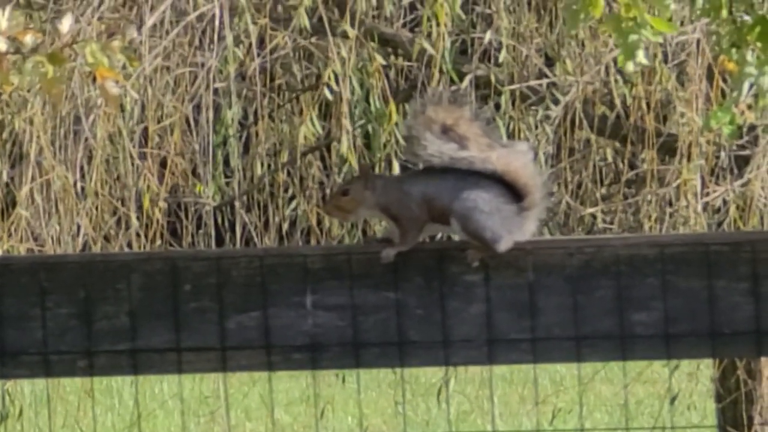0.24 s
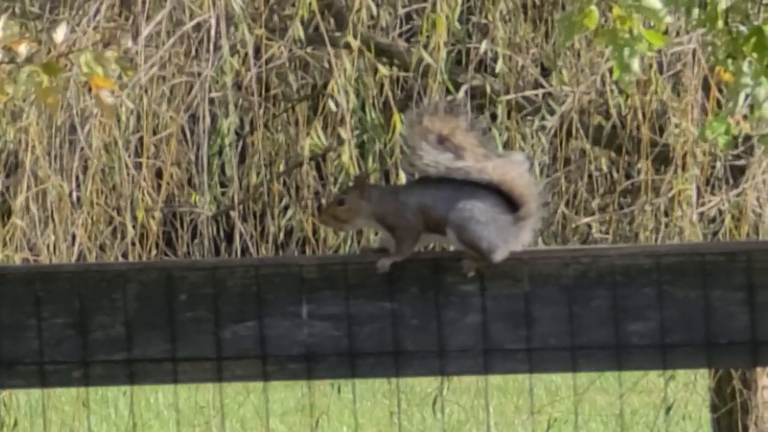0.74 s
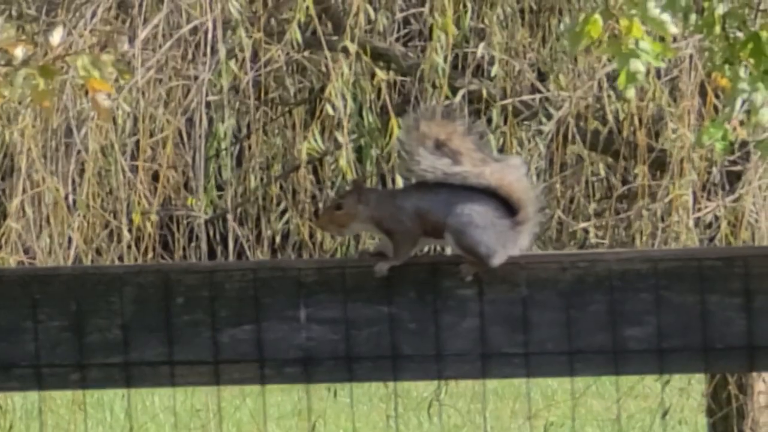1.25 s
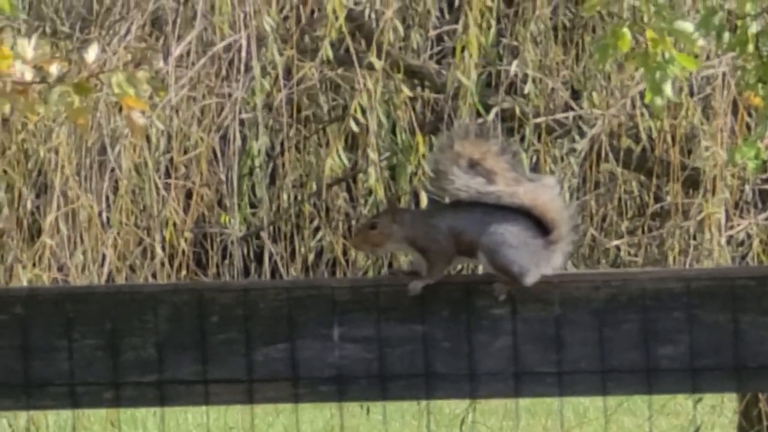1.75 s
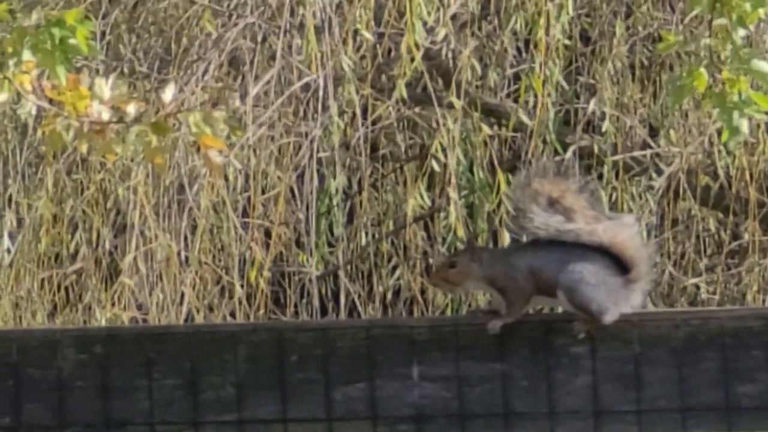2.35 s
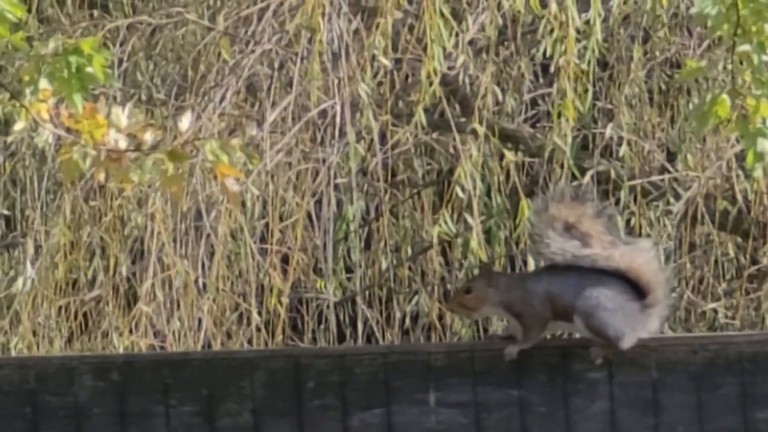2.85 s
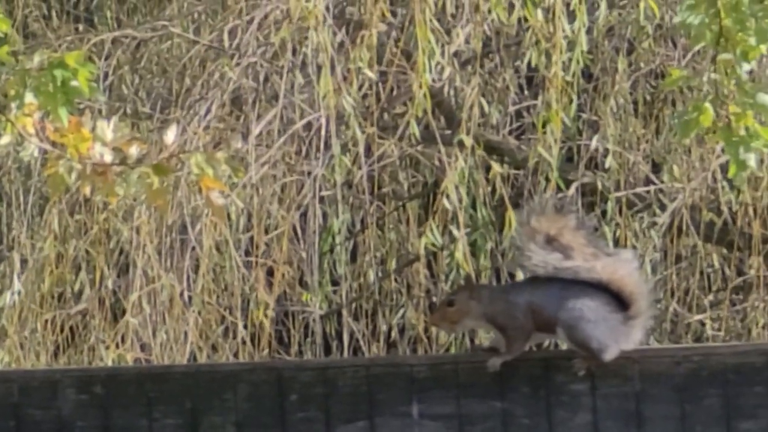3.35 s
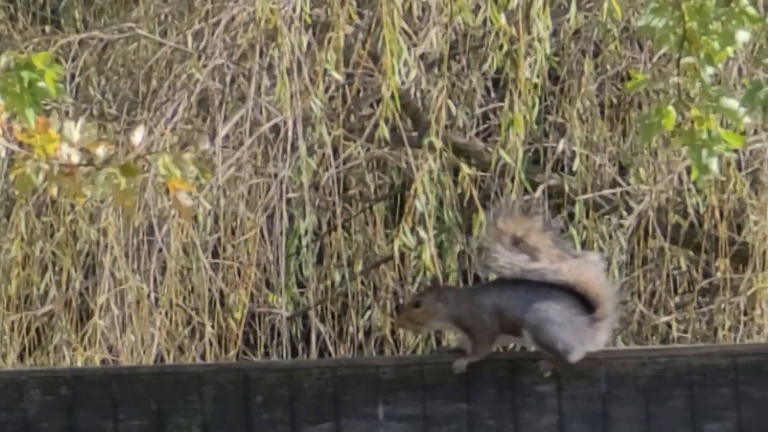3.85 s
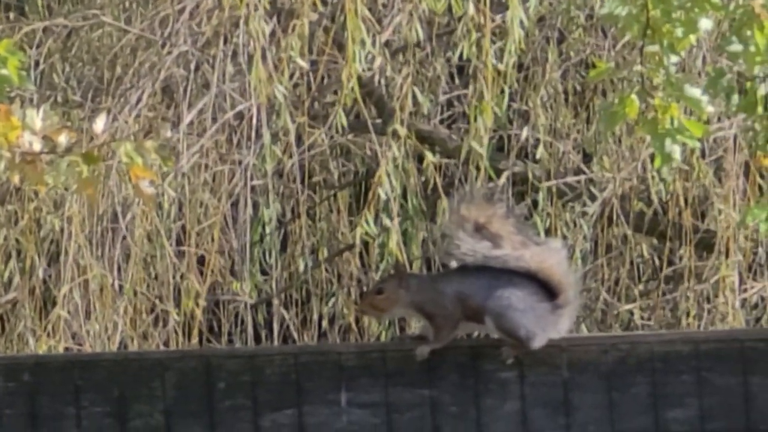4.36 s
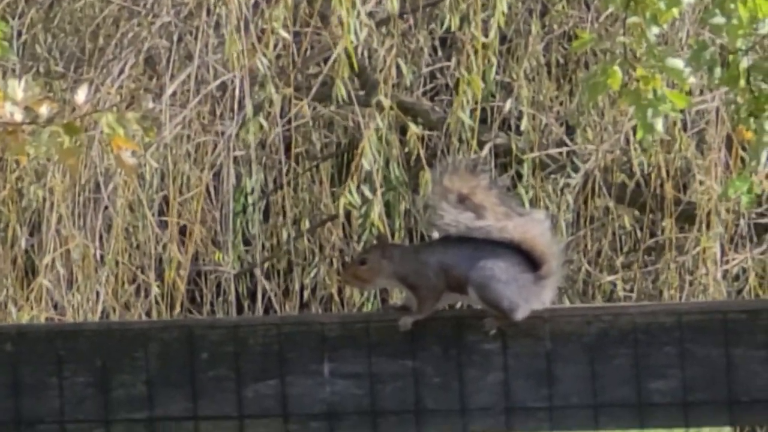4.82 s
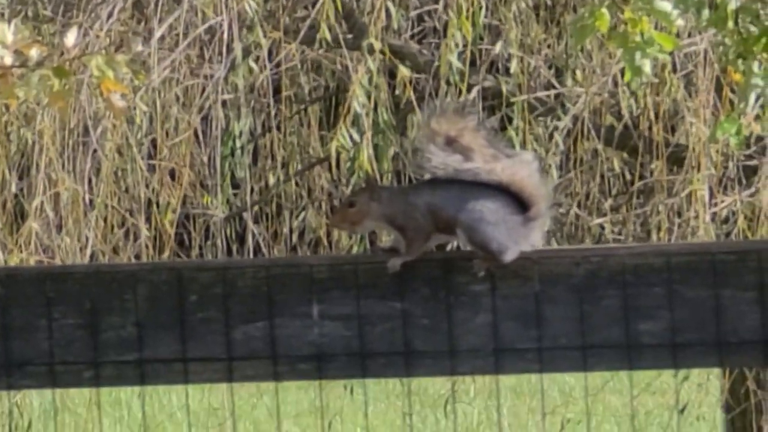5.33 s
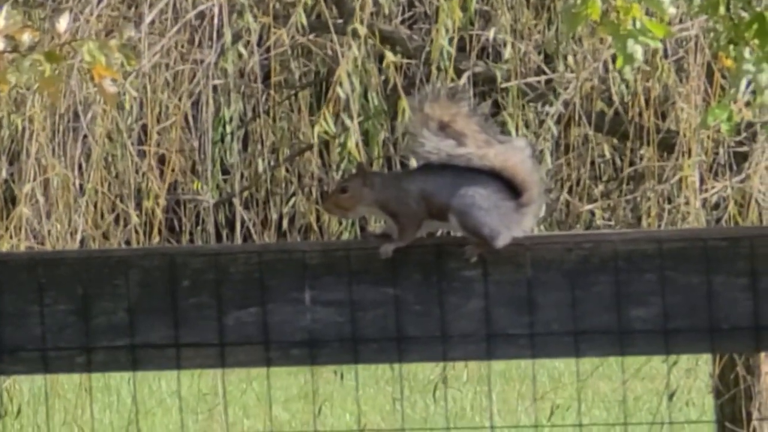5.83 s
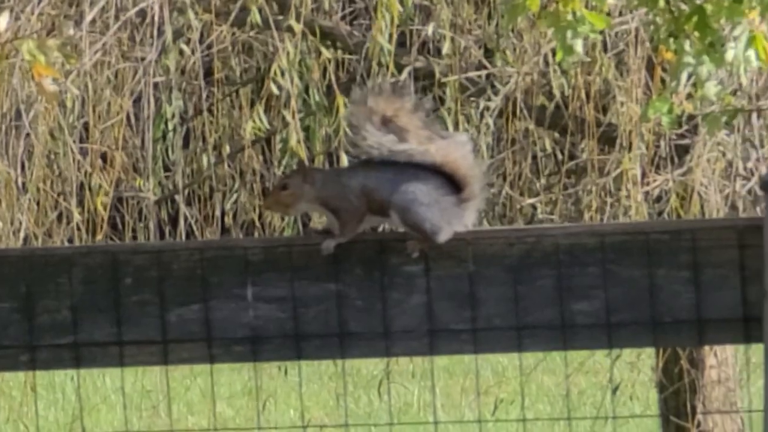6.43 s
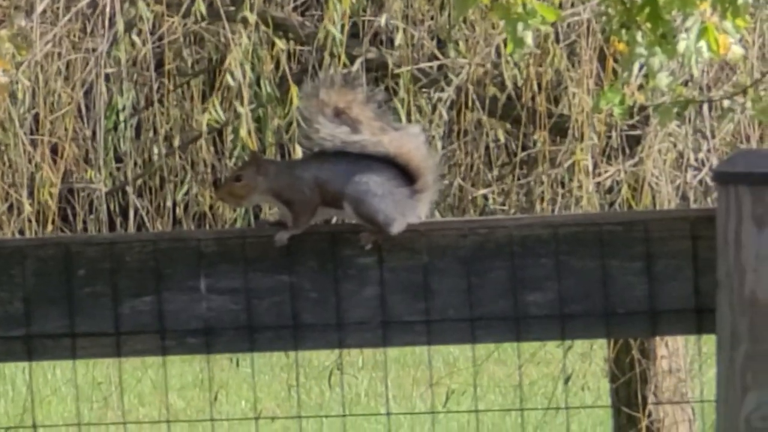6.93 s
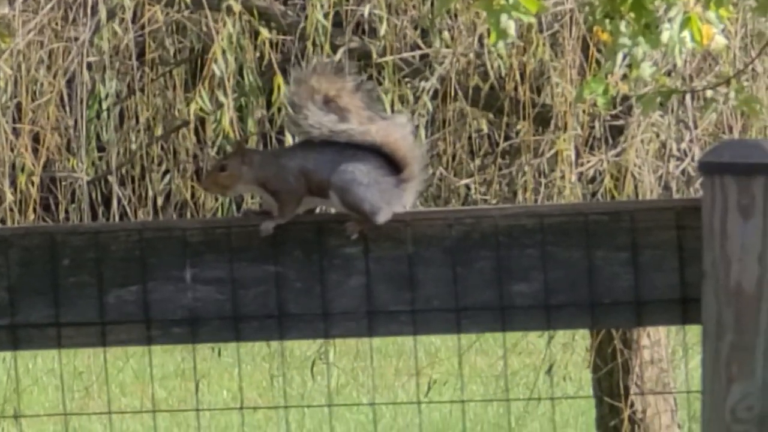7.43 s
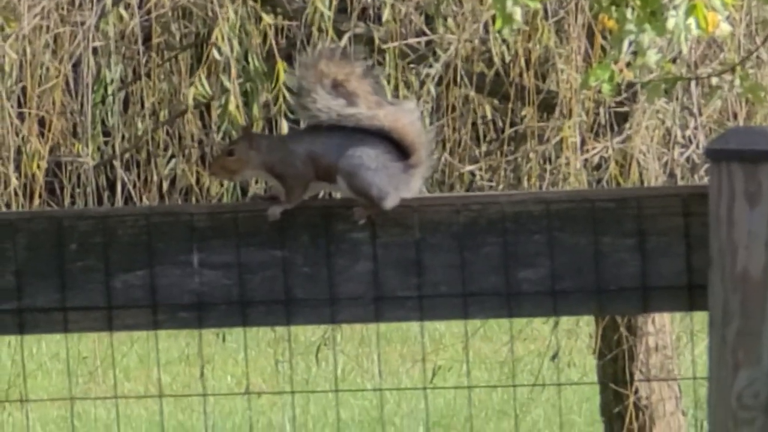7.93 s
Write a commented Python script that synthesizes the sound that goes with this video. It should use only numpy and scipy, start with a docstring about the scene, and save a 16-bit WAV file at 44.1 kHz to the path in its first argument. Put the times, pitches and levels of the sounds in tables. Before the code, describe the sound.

A nearby squirrel scolds in a garden with three long screeches about two seconds apart, each starting as a rasp, clearing into a squeal and trailing off in a thin whine. A small dry crackle sounds close by, then the squirrel gives four short hoarse barks. Behind it, small birds whistle quick high chips and faint insects chirp over soft air and a low distant rumble.

```python
"""A scolding squirrel

A grey squirrel on a garden fence gives three long screeches that rasp, clear into a squeal and trail
off in a whine, then four hoarse barks. Its larynx is a source of pulses and turbulent noise, and its
throat and mouth are the filter. Behind it small birds whistle short chips and insects stridulate in
the bushes, over soft air and a distant low rumble. One small dry crackle sounds close by."""
import sys
import numpy as np
from scipy import signal
from scipy.fft import rfft, irfft
from scipy.io import wavfile
from scipy.ndimage import uniform_filter1d

SR = 44100
rng = np.random.default_rng(int(sys.argv[2]) if len(sys.argv) > 2 else 0)


def generate_wav(sig):
    """Save sig (samples, or channels by samples) to the path in sys.argv[1] as 16-bit PCM at SR."""
    pcm = np.round(np.clip(np.atleast_2d(sig).T, -1, 1) * 32767).astype(np.int16)
    wavfile.write(sys.argv[1], SR, pcm)


N = 360738
TIME, FREQS = np.arange(N) / SR, np.arange(N // 2 + 1) * SR / N

# Levels are relative within each table. Roughness and strain run from 0 to 1.
# Screeches: start_s, swell_s, rasp_s, squeal_s, release_s, rasp_db, squeal_db, droop_hz,
# squeal_start_hz, squeal_end_hz, grunt_rough, squeal_rough, grunt_strain, final_strain
SCREECHES = [(1.023, .014, .479, .105, .04, -43.5, -38, 10, 570, 511.7, 0.28, 0.14, 0, 0.86),
             (2.989, 0.01, .402, .153, .018, -43.5, -39.5, 4, 566.5, 519.3, 0.21, 0.16, 0.06, 0.87),
             (5.172, 0.084, .345, .02, .03, -43, -44, 55, 560, 577.3, 0.83, .42, .24, 0.8)]
# Thin whines after the screeches: start_s, length_s, pitch_hz, wobble_hz, level_db, strain
WHINES = [(1.64, 0.15, 1210, 28.5, -49, .26), (3.558, 0.11, 1210, 44.9, -49.5, 0.28),
          (5.535, 0.015, 1470, 8, -46, .5)]
# Hoarse barks: start_s, length_s, peak_db
BARKS = [(6.34, 0.11, -44.5), (6.572, .072, -47), (7.208, .098, -46.5), (8.013, .11, -42.5)]
# Resonances of throat and mouth: centre_hz, nominal_width_hz, grunt_db, rasp_db, squeal_db
FORMANTS = [(725, 410, -1, -19, -22), (1245, 1110, -4.5, -17, -31), (1760, 750, -2.5, -42, -7),
            (2143, 440, -2, 2.5, 4.5), (2571, 270, 9.5, 7, -9), (2893, 340, -2.5, 2.5, -8),
            (3197, 650, -14, -3.5, -51), (3985, 1220, -23.5, -20.5, -8), (7960, 3400, -16, -36.5, -32.5)]
# Phase lead of the voice in the left channel: frequency_hz, lead_rad
LEFT_LEAD = [(100, 0), (800, .1), (1200, .9), (1450, 2.7), (1700, 5.0), (2000, 6.2), (2250, 7.0),
             (2400, 8.3), (2600, 10.8), (2800, 10.9), (3050, 12.4), (3400, 13.6), (3750, 11.8),
             (4200, 13.4)]
# Runs of bird chips: start_s, chip_count, spacing_s, length_s, pitch_hz, level_db
CHIP_RUNS = [(0.322, 1, .054, 0.011, 3750, -43), (1.735, 3, .061, 0.018, 4230, -63.5),
             (3.49, 2, .053, 0.0097, 3690, -38.5), (3.938, 3, 0.052, 0.025, 3750, -46.5),
             (4.471, 3, 0.049, 0.02, 4100, -62), (4.99, 3, 0.053, 0.026, 3730, -46),
             (5.607, 3, .055, .018, 3750, -44), (6.365, 3, 0.055, 0.026, 3827, -41),
             (6.656, 3, .062, 0.02046, 4160, -65)]
# Contour of one chip: length_share, pitch_ratio, amplitude
CHIP_CONTOUR = [(0, 0.995, 0.26), (.12, 1.005, 0.42), (.4, 1.02, 0.73), (.7, 0.98, 1), (.87, 0.933, 0.12),
                (1, 1.03, 0.24)]
# Phrases of the near cricket: start_s, chirp_count
CRICKET_PHRASES = [(.39, 2), (2.785, 2), (3.34, 2), (4.02, 3), (4.732, 3), (5.44, 3), (6.015, 3),
                   (6.765, 3), (7.321, 3), (8.059, 3)]
# Beats of the bush-crickets: first_buzz_s, period_s, level_db
BUZZ_BEATS = [(0.529, .555, -72), (0.099, .291, -77)]
# Snaps of the crackle: start_s, level_db
SNAPS = [(5.9855, -49), (5.998, -50), (6.0065, -45), (6.0098, -47), (6.0177, -32.5)]
# Spectrum of the distant rumble: frequency_hz, level_db
RUMBLE_SPECTRUM = [(11, -61), (18, -8), (65, -1.5), (81, -2.5), (103, -10.5), (124, -11), (162, -16),
                   (204, -26.5), (240, -21.5), (310, -41), (530, -120)]
# Slow changes in the rumble: time_s, level_db
RUMBLE_ENVELOPE = [(0.0, -57.5), (0.52, -59.5), (4.33, -60.5), (4.42, -61.5), (5.24, -60), (5.78, -62.5),
                   (7.24, -59.5), (8.18, -63.5)]
# Spectrum of the garden air: frequency_hz, level_db
AIR_SPECTRUM = [(130, -9.5), (220, -6.5), (304, -3.5), (334, -1), (416, -1.5), (582, -6.5), (751, -4),
                (1000, -11.5), (2310, -14), (3500, -17.5), (4550, -50), (7700, -120)]
# Spectrum of the insect chorus: frequency_hz, level_db
CHORUS_SPECTRUM = [(2000, -46), (3400, -15), (3770, -6), (4380, -7.5), (4760, -3), (5050, -9),
                   (5900, -11.5), (6010, -15.5), (6500, -15), (8100, -5), (8480, -5), (8930, -11.5),
                   (10400, -16), (15100, -13), (16000, -17)]
# Left-right likeness of the diffuse background: frequency_hz, coherence
COHERENCE = [(60, 0.88), (130, 0.79), (290, 0.52), (640, 0.047), (1410, -0.15), (3100, -0.037),
             (6820, -0.24), (15000, 0.041)]

ATTACK_S, BARK_PEAK_SHARE = .005, .45   # a bark peaks at this share of its length


def squirrel():
    """Source-filter voice: strain drains the low formants and focuses the energy on the squeal."""
    effort, pitch, rough, strain = scolding()
    source = larynx(pitch, np.clip(rough, .01, 1))
    voice = sum(shaped(source, resonance(hz, width) ** 2) * from_db(np.interp(strain, [0, .5, 1], dbs))
                for hz, width, *dbs in FORMANTS)
    voice += from_db(-38) * source * rough   # a thin broad fizz rides on the rasp
    open_throat = sum(swell(s + length_s / 4, length_s * BARK_PEAK_SHARE * 2)
                      for s, length_s, _ in BARKS)
    voice += from_db(-6.5) * open_throat * shaped(voice, resonance(1060.3, 400))
    hiss = band_noise(resonance(4204, 800) ** 2)   # air forced through the tight throat
    voice += from_db(-28) * strain ** 4 * hiss
    lead = np.exp(.5j * over_hz(LEFT_LEAD))
    ears = panned(np.array([shaped(voice, lead), shaped(voice, lead.conj())]), left_db=2.1)
    ears += from_db(-9) * scatter(voice, t60_s=.07, delay_s=.004)
    running_rms = np.sqrt(uniform_filter1d(ears.mean(0) ** 2, size=1100) + 1e-12)
    return from_db(1.24) * ears / running_rms * uniform_filter1d(effort, size=150)


def larynx(pitch_hz, rough):
    """Phonation: as roughness grows, periodic pulses turn irregular and give way to turbulence."""
    jitter = .045 * rough * drift(173.7)
    waver = .024 * np.sqrt(rough) * drift(35.3)
    phase = phase_of(pitch_hz * (1 + jitter + waver))
    pulses = rms_one(sum(np.cos(k * phase) for k in range(1, 17)))
    turbulence = rng.standard_normal(N) * (1 + np.cos(phase) / 2)   # peaks once a cycle
    source = (1 - 1.18 * rough ** 2) * pulses + 1.2 * (.99 * rough ** 1.34 + .028) * turbulence
    return source * from_db(2.2 * rough * drift(220))


def scolding():
    """One throat, one call at a time: the strongest sets effort, pitch, roughness and strain."""
    controls = np.zeros((4, N))
    for call, rows in ((screech, SCREECHES), (whine, WHINES), (bark, BARKS)):
        for row in rows:
            candidate = call(*row)
            leads = candidate[0] >= controls[0]
            controls = [np.where(leads, new, old) for new, old in zip(candidate, controls)]
    return controls


def screech(start_s, swell_s, rasp_s, squeal_s, release_s, rasp_db, squeal_db, droop_hz,
            squeal_start_hz, squeal_end_hz, grunt_rough, squeal_rough, grunt_strain, final_strain):
    """Changes of vibration regime: a grunt breaks into an irregular rasp, then clears to a squeal."""
    grunt_s, break_s, catch_s, lift_s, clear_s = .037, .015, .0545, .075, .026
    grunt_hz, rasp_hz, scoop_hz = 665, 544.3, 169.3
    t = np.maximum(TIME - start_s, 0)
    broken, cleared = ramp(t - grunt_s, break_s), ramp(t - rasp_s + clear_s, clear_s)
    rasping, squealing = ramp(t, rasp_s), ramp(t - rasp_s, squeal_s + release_s)
    catch = swell(start_s + rasp_s - catch_s, 2 * catch_s)   # softer and rougher before the squeal
    hoarse = decay(t - rasp_s + clear_s, .03)

    pitch = blend(rasp_hz, grunt_hz, decay(t - grunt_s, .13))   # sags through the rasp
    pitch -= scoop_hz * decay(t, .012)
    pitch -= droop_hz * swell(start_s + rasp_s - lift_s, lift_s)
    glide = blend(squeal_start_hz, squeal_end_hz, squealing)
    pitch = blend(pitch, glide, ramp(t - rasp_s + lift_s, lift_s))

    rasp_rough = blend(.92, .48, ramp(rasping, .55) ** 2) + .27 * catch
    rough = blend(squeal_rough, blend(grunt_rough, rasp_rough, broken), hoarse)
    strain = final_strain * blend(blend(.39, .83, rasping), 1, np.sqrt(squealing))
    strain = blend(grunt_strain, strain, ramp(t, grunt_s + break_s) ** 2)

    arch_db = -.5 * np.cos(2 * np.pi * rasping)
    db = rasp_db - 10.5 * decay(t, swell_s) - catch + arch_db
    db = blend(db, squeal_db - 4.5 * np.sqrt(hoarse), cleared)   # the squeal starts soft, then firms up
    return from_db(db) * gate(t, rasp_s + squeal_s, release_s), pitch, rough, strain


def whine(start_s, length_s, pitch_hz, wobble_hz, level_db, strain):
    """Register shift: the voice flips high and fades, with vibrato and tremolo in phase."""
    wobble_s, fade_db_per_s, rise_hz_per_s, rough = .078, 45, 420, .23
    t = np.maximum(TIME - start_s, 0)
    wobble = -np.cos(2 * np.pi * t / wobble_s)
    effort = from_db(level_db + 2.5 * wobble - fade_db_per_s * t) * gate(t, length_s, release_s=.025)
    pitch = pitch_hz + rise_hz_per_s * t + wobble_hz * wobble
    return effort, pitch, rough, strain


def bark(start_s, length_s, peak_db):
    """One push of breath: pitch, loudness and periodicity arch while the throat tightens."""
    t = TIME - start_s
    arch_s, tail_db_per_s = [0, BARK_PEAK_SHARE * length_s, length_s], 247
    db = peak_db + np.interp(t, arch_s, [-15, 0, -16]) - tail_db_per_s * np.maximum(t - length_s, 0)
    pitch_hz = np.interp(t, arch_s, [620.4, 743, 711])
    rough = np.interp(t, arch_s, [.95, .68, .95])
    strain = np.interp(t, arch_s, [0, .14, .33])
    return from_db(db) * ramp(t, ATTACK_S), pitch_hz, rough, strain


def birds():
    """Frequency modulation: each chip is a nearly pure whistle that arches and drops."""
    chips = np.zeros(N)
    share, ratio, amplitude = np.transpose(CHIP_CONTOUR)
    for start_s, count, spacing_s, length_s, pitch_hz, level_db in CHIP_RUNS:
        progress = np.linspace(0, 1, int(length_s * SR))
        phase = phase_of(pitch_hz * np.interp(progress, share, ratio))
        tone = np.sin(phase) + from_db(-23.5) * np.sin(2 * phase) + from_db(-28.5) * np.sin(3 * phase)
        chip = np.sqrt(2) * np.interp(progress, share, amplitude) * tone
        for k in range(round(count)):
            start = int((start_s + k * spacing_s) * SR)
            soft_start_db = 5.5 / (k + 1) ** 2
            chips[start:start + len(chip)] += from_db(level_db - soft_start_db) * chip
    return chips


def far_flock(pitch_hz, spacing_s):
    """At a distance scattered sound outweighs direct sound, blurring the flock's downward slurs."""
    turns = np.cumsum(1 + .1 * drift(6.66)) / (spacing_s * SR)
    progress = ramp(turns % 1, .5)   # each note fills half of its turn
    phase = phase_of(pitch_hz * (1.05 - .08 * progress + .038 * drift(6)))
    loudness = np.clip(.7 + .5 * drift(1.2), 0, 1.4)
    notes = loudness * np.sin(np.pi * progress) * np.sin(phase)
    return from_db(-74) * (notes + from_db(9.5) * scatter(notes, t60_s=.13, delay_s=.004))


def crickets(near_hz, far_hz, spacing_s, trill_period_s, stroke_hz):
    """Resonant stridulation: one cricket chirps in twos and threes; a fainter one trills nine times."""
    chirps = sum(swell(s + k * spacing_s, .022)
                 for s, count in CRICKET_PHRASES for k in range(round(count)))
    near = chirps * np.sqrt(2) * np.sin(phase_of(near_hz * (1 + .00574 * drift(167))))
    trills = sum(swell(.095 + k * trill_period_s, .115) for k in range(9))
    strokes = np.abs(np.sin(np.pi * stroke_hz * TIME))
    far = trills * strokes * band_noise(resonance(far_hz, 110))
    return from_db(-67) * near + from_db(-77) * far


def bush_crickets(stroke_hz, ring_hz):
    """Impulse excitation: wing strokes ring a resonance, in buzzes that stray a little off the beat."""
    stroke_count = np.floor(np.cumsum(stroke_hz * (1 + .29 * drift(40))) / SR)
    ticks = rms_one(shaped(np.diff(stroke_count, prepend=0), resonance(ring_hz, 640)))
    beats = [(s, db) for first_s, period_s, db in BUZZ_BEATS
             for s in np.arange(first_s, TIME[-1], period_s)]
    strays = rng.standard_normal((100, 2))
    buzz = ticks * sum(from_db(db + 2.5 * louder) * swell(s + .033 * later, .055)
                       for (s, db), (later, louder) in zip(beats, strays))
    return from_db(2) * buzz + from_db(5.5) * scatter(buzz, t60_s=.047, delay_s=.001)


def lisping_insect(centre_hz, beat_hz):
    """Amplitude modulation: a high band of noise lisps in a slow beat."""
    beat = np.maximum(np.cos(2 * np.pi * beat_hz * (TIME - .1)), 0) ** 2
    band = resonance(centre_hz, 840) + from_db(-15) * resonance(17700, 1300)
    return from_db(-80) * beat * diffuse_noise(band)


def crackle():
    """Brief impulses have broad spectra: bright snaps, with a narrow resonance for a woody knock."""
    clicks = np.zeros(N)
    for start_s, level_db in SNAPS:
        clicks[round(start_s * SR)] = from_db(level_db)
    snaps = from_db(9) * scatter(clicks, t60_s=.004, delay_s=0)
    return panned(shaped(snaps, resonance(7500, 8000) + resonance(1350, 400)), left_db=12)


def background():
    """Incoherent sources add up to noise: far rumble, soft air and a shimmering insect chorus."""
    rumble = from_db(2) * diffuse_noise(from_db(over_hz(RUMBLE_SPECTRUM)))
    drone = from_db(-3.5) * diffuse_noise(resonance(67.44, 4.4))
    envelope = from_db(np.interp(TIME, *np.transpose(RUMBLE_ENVELOPE)))
    air = from_db(-66.5) * diffuse_noise(from_db(over_hz(AIR_SPECTRUM)))
    chorus = from_db(-70) * diffuse_noise(from_db(over_hz(CHORUS_SPECTRUM)))
    shimmer = from_db(-81 + 4.5 * drift(9)) * diffuse_noise(resonance(7700, 700))
    return envelope * (rumble + drone) + air + panned(chorus, left_db=1) + shimmer


def diffuse_noise(response):
    """A diffuse field is coherent between the ears only at long wavelengths."""
    coherence = over_hz(COHERENCE)
    mid = shaped(rng.standard_normal(N), response)
    side = shaped(rng.standard_normal(N), response * np.sqrt((1 - coherence) / (1 + coherence)))
    return (mid + side * [[1], [-1]]) / np.std(mid)


def scatter(x, t60_s, delay_s):
    """Scattering by leaves and boards: dense, exponentially dying echoes, different at each ear."""
    t = TIME[:SR]
    echoes = rng.standard_normal((2, SR)) * from_db(-60 * t / t60_s) * (t > delay_s)
    echoes /= np.sqrt(np.sum(echoes ** 2, axis=1, keepdims=True)) + 1e-20
    return signal.fftconvolve(x[None], echoes, axes=1)[:, :N]


def panned(x, left_db):
    """A level difference between the ears sets direction."""
    return x * from_db([[left_db / 2], [-left_db / 2]])


def resonance(hz, width_hz):
    """Lorentzian peak, with its full width at half height."""
    return 1 / (1 + (2 * (FREQS - hz) / width_hz) ** 2)


def shaped(x, response):
    """Filtering multiplies the spectrum by a response."""
    return irfft(rfft(x) * response, N)


def band_noise(response):
    """Filtered white noise of unit power."""
    return rms_one(shaped(rng.standard_normal(N), response))


def drift(rate_hz):
    """Low-pass noise: a smooth random fluctuation of unit power."""
    return band_noise(resonance(0, 2 * rate_hz))


def phase_of(hz):
    """Phase is the integral of frequency."""
    return 2 * np.pi * np.cumsum(hz) / SR


def over_hz(points):
    """Interpolation on a logarithmic frequency axis."""
    hz, value = np.transpose(points)
    return np.interp(np.log(FREQS + 1e-6), np.log(hz), value)


def swell(centre_s, scale_s):
    """Parabolic envelope lasting sqrt(2) times its scale."""
    return np.maximum(1 - 2 * ((TIME - centre_s) / scale_s) ** 2, 0)


def gate(t, hold_s, release_s):
    """Trapezoidal envelope: attack, hold, release."""
    return ramp(t, ATTACK_S) * (1 - ramp(t - hold_s, release_s))


def decay(t, tau_s):
    """Exponential relaxation from 1, beginning at t = 0."""
    return np.exp(-np.maximum(t, 0) / tau_s)


def ramp(x, span):
    """Linear rise from 0 to 1 over a span."""
    return np.clip(x / span, 0, 1)


def blend(a, b, share):
    """Linear interpolation."""
    return a + (b - a) * share


def from_db(db):
    """Decibels to amplitude ratio."""
    return 10 ** (np.asarray(db) / 20)


def rms_one(x):
    """Normalisation to unit power."""
    return x / np.sqrt(np.mean(x ** 2) + 1e-20)


def scene():
    """Superposition: the near squirrel, a faint garden echo, birds, insects, crackle and background."""
    calls, chips = squirrel(), birds()
    echo = from_db(-18) * scatter(calls.mean(0) + from_db(-10) * chips, t60_s=.45, delay_s=.012)
    flock = far_flock(pitch_hz=4150, spacing_s=.062)
    insects = (crickets(near_hz=4690, far_hz=5715, spacing_s=.062, trill_period_s=.495, stroke_hz=24)
               + bush_crickets(stroke_hz=80, ring_hz=8140)
               + lisping_insect(centre_hz=9500, beat_hz=3.25))
    return calls + echo + chips + flock + insects + crackle() + background()


def record(dry):
    """Band limiting: a steep low-pass removes the highest treble."""
    cutoff_hz = 15900
    return shaped(dry, 1 / np.sqrt(1 + (FREQS / cutoff_hz) ** 300))


dry = scene()
out = record(dry)
generate_wav(out)
```